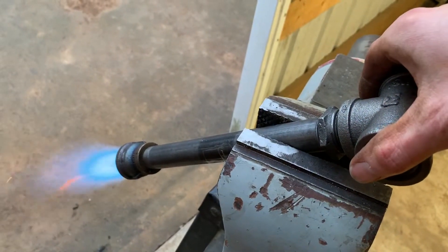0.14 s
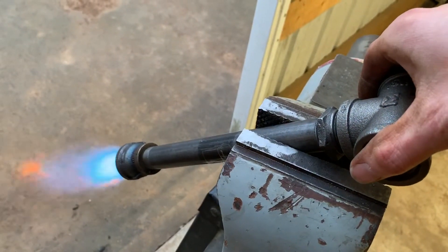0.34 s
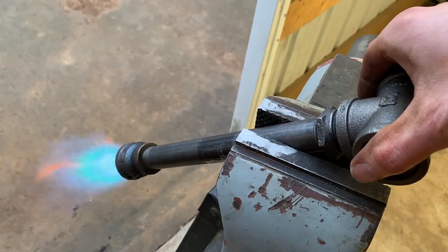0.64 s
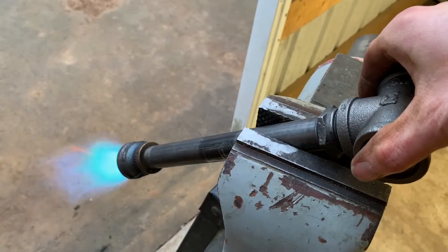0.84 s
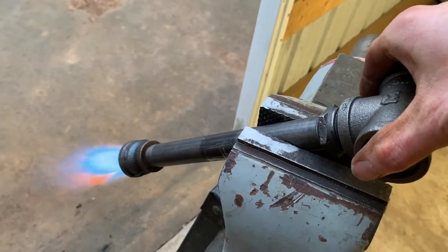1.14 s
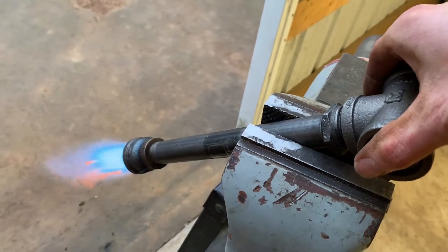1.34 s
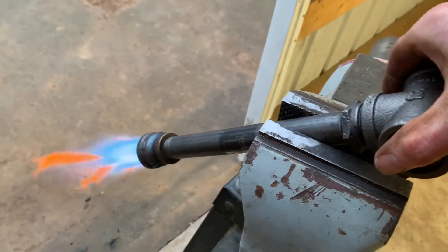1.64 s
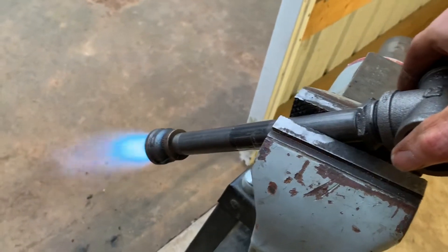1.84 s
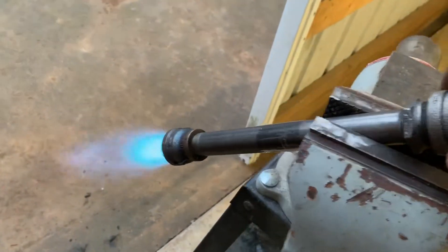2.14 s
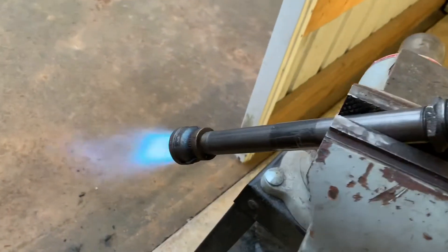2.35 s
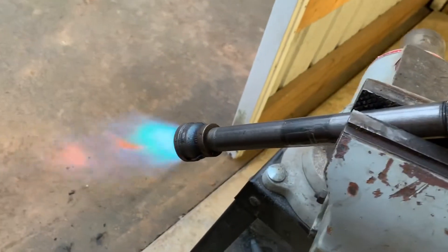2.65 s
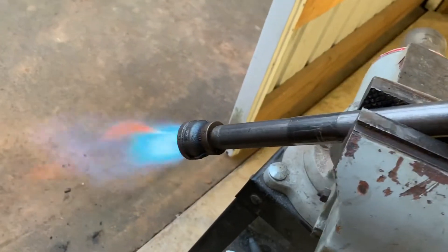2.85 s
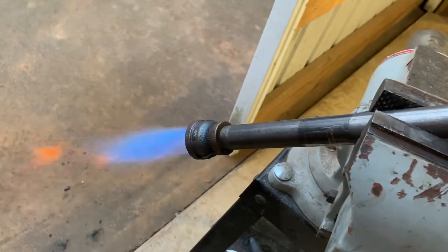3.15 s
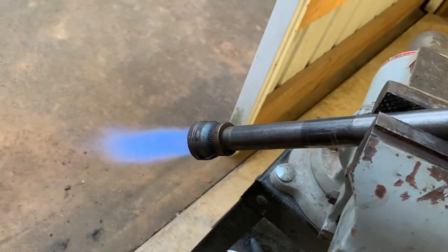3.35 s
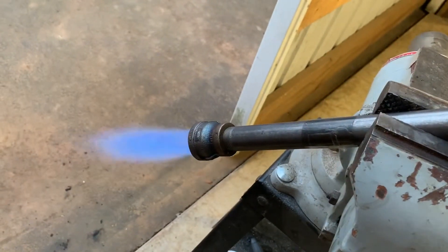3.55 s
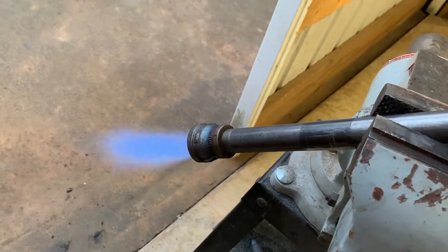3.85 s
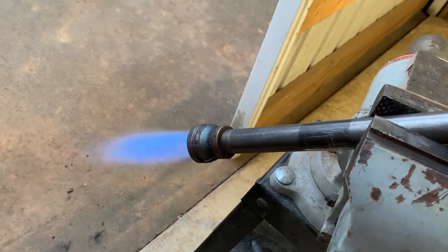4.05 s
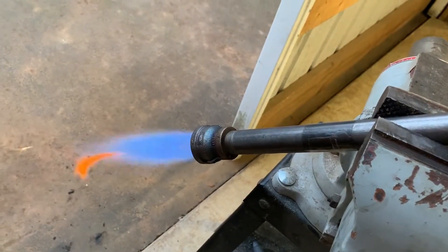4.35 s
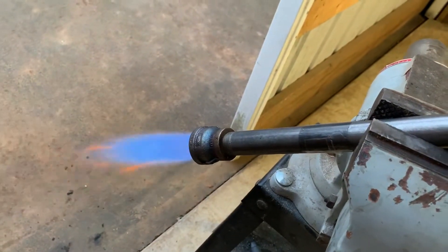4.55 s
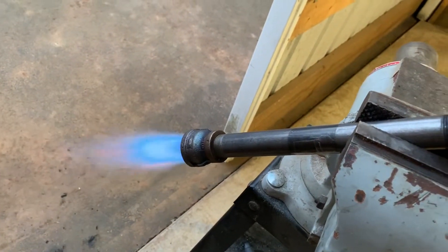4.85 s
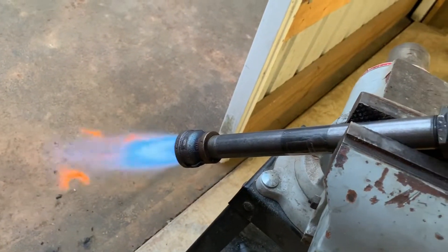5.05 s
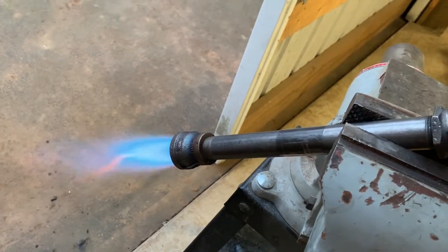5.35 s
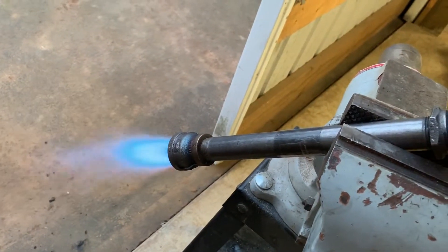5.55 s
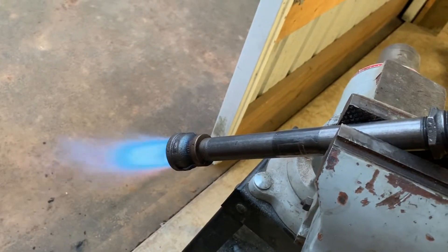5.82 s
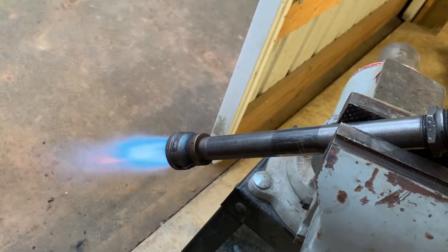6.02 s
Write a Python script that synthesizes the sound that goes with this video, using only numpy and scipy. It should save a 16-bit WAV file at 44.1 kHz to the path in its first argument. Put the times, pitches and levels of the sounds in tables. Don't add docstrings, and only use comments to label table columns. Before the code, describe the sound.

A gas burner in a steel vice is already burning at full force and never stops, heard close on a hand-held stereo microphone in a workshop doorway. From 0 to about 1.6 seconds the roar is steady: a low boom around a soft pitchless hum, a thick midrange rush and a bright, hollow, pipe-coloured hiss, with small flame puffs. Between 1.6 and 3.1 seconds the microphone drifts, the hiss changes colour in a sweeping, phasey way, and firmer puffs come near 2.3 and 2.6. At about 3.2 seconds a deep rumble swells sharply, with heavy, wind-like buffeting and thumps near 3.2, 3.6, 3.9 and 4.3. A brief brighter hiss passes near 4.6. By 4.9 the rumble falls away and the tone shifts again, leaving a steadier rushing roar that continues to the end at 6.2 seconds, cut off while burning.

```python
import sys
import numpy as np
from scipy import signal
from scipy.fft import rfft, irfft, next_fast_len
from scipy.io import wavfile
from scipy.ndimage import uniform_filter1d

SR = 44100
rng = np.random.default_rng(int(sys.argv[2]) if len(sys.argv) > 2 else 0)


def pcm_store(signal):
    levels = np.round(np.clip(np.atleast_2d(signal), -1, 1) * 32767)
    wavfile.write(sys.argv[1], SR, levels.astype(np.int16).T)


def ratio(d):
    e = np.asarray(d, float) / 20
    return 10 ** e


N = 272538
HOP, WIN = 256, 2048

# (frequency [Hz], right's phase lead [rad], left-right level [dB], likeness [0-1])
PORTS_BASS = [(30, 0.11, 0, 1), (250, -0.2, 0.5, 1), (448, -0.13, 0, 1), (685, -0.65, -1, 0.97),
              (790, 0, 2, 0.93), (935, -0.017, 1.5, 0.78)]


def along(points, hz):
    f, *cols = np.transpose(points)
    return [np.interp(np.log(hz + 1), np.log(f + 1), c)[:, None] for c in cols]


def curves(rows, t):
    s, *cols = np.transpose(rows)
    return [np.interp(t, s, c) for c in cols]


def filtered(x, response):
    m = next_fast_len(N + 8192)
    return irfft(rfft(x, m) * response(np.fft.rfftfreq(m, 1 / SR)), m)[..., :N]


def noise():
    return signal.stft(rng.standard_normal(N), SR, nperseg=WIN, noverlap=WIN - HOP)


def patches(shape, bins, frames):
    field = rng.standard_normal(shape)
    field = uniform_filter1d(field, bins, 0)
    field = uniform_filter1d(field, frames, 1)
    return field / field.std()


def hump(x, centre, width):
    return 1 / (1 + (2 * (x - centre) / width) ** 2) ** 2


def camera_place(t):
    # (time [s], place [0-3])
    path = [
        (0, 0),
        (1.6, 0),
        (2.05, .4),
        (2.35, .9),
        (2.6, 1.15),
        (2.8, 1.75),
        (3.15, 2),
        (4.55, 2),
        (4.8, 3),
        (6.18, 3),
    ]
    return curves(path, t)[0]


def at_place(db, place):
    return np.interp(place, np.arange(4), db)


def turbulence_db():
    # (time [s], level over calm [dB])
    stir = [(0, -2), (.4, -1), (1.4, -1), (2.25, 3.5), (2.9, 4.5), (3.1, 4.5), (3.25, 13), (3.85, 11),
            (4.3, 12), (4.7, 10.5), (4.9, 3.5), (5.3, 0.5), (6.18, -1.5)]
    return curves(stir, np.arange(N) / SR)[0]


def burning_noise(spectrum):
    steady_s = 0.29
    x = filtered(rng.standard_normal(N), lambda hz: ratio(along(spectrum, hz)[0][:, 0]))
    power = abs(uniform_filter1d(x ** 2, int(steady_s * SR)))
    return x / np.sqrt(power + 1e-20)


def rumble(stir_db):
    # (frequency [Hz], density [dB per Hz])
    eddy_spectrum = [(11, -46), (18, -28), (59, 6.5), (160, 7), (210, -39), (350, -120)]
    calm_db = -28.5
    return ratio(calm_db + stir_db) * burning_noise(eddy_spectrum)


def boom(stir_db):
    # (frequency [Hz], density [dB per Hz])
    cone_spectrum = [(65, -26), (110, -10.5), (162, -1.5), (204, 2), (284, -10), (293, -18), (302, -18),
                     (320, -20), (420, -69), (700, -120)]
    calm_db, follows = -17.5, 0.23
    return ratio(calm_db + follows * stir_db) * burning_noise(cone_spectrum)


def hiss_share(f):
    split_hz = 2500
    return 1 / (1 + (split_hz / (f + 1)) ** 4)


def pressure_db(f, t):
    # (time [s], pressure swing [dB])
    swings = [
        (0, -2),
        (1.4, -0.5),
        (2.3, 1),
        (2.75, -0.5),
        (3.2, 0.5),
        (4.4, 1),
        (5.2, 1),
        (5.8, 0.5),
        (6.18, 1.5),
    ]
    rush_db, rush_follows, hiss_db = -7, 0.37, -7.5
    swing_db, = curves(swings, t)
    high = hiss_share(f)
    return (rush_db + rush_follows * swing_db) * (1 - high) + (hiss_db + swing_db) * high


def bed_db(hz):
    # (frequency [Hz], density [dB per Hz])
    bed_spectrum = [(280, -5.5), (330, 1.4), (520, -1.73), (740, -10), (950, -11.5), (1550, -10),
                    (2000, -15.5), (3000, -16.5), (4300, -22.5), (6300, -26.5), (7300, -24.5), (9000, -27),
                    (12500, -21), (15700, -23.5)]
    return along(bed_spectrum, hz)[0]


def resonances(f, place):
    # (frequency [Hz], width [Hz], level over bed at places 0, 1, 2,
    # 3 [dB])
    stream_modes = [(419, 78, 1, 2, 0.77, -2.5), (643.5, 146, 8.5, 7.5, 7, 6.5), (827, 43, -4, 6.5, 8.8, 8),
                    (1087, 65, 2, -17, 9, 2.5), (1246, 81, 4.5, 6.5, 2.2, 3), (1396, 136, -14, 2, 8.5, 5),
                    (1768, 114, -3, -7, 7.9, 7), (2350, 320, -19, -18, 1.6, -30),
                    (2720, 510, -17, -2, 2.5, 2), (3160, 58, -14, -20, -17, -9),
                  (3590, 110, 11, 1.5, 11.5, 3.5), (4044, 123, 8, -21, 11.5, 6.5), (4525, 200, -1, 7, 9, 6),
                  (5000, 100, 9.5, -17, 8.5, 3), (5213, 92, 10, 11.5, 3, 7), (5570, 79, 10, 4, 7, -12),
                  (6200, 80, -14, 11, 4, -4), (6720, 88, -7, 12, 5, 5), (6950, 72, 8, 6, -7, -2),
                  (7580, 250, 6.5, 8, 10.5, -24),
                    (8190, 560, 4.5, 8.5, 6, 1), (8810, 280, 7.5, 8, 3, 6), (10150, 1400, 6.5, 7, 2.5, 3),
                     (10880, 570, -4, -1, 2.5, 1), (11400, 260, 4, -2, -15, -6),
                     (11850, 430, 4, -8, -17, -10), (11950, 350, 2, -8, -10, -1),
                     (13100, 350, 10, -10, 6, 8), (14050, 500, -8, -12, 8, -10),
                     (14700, 400, 11.5, 4, -1, -6)]
    power = 0
    for centre, width, *db in stream_modes:
        power = power + hump(f, centre, width) * ratio(at_place(db, place)) ** 2
    return power


def echo_valleys_db(f, place):
    # (frequency [Hz], width [Hz], level change at places 0, 1, 2, 3 [dB])
    valleys = [(761, 56, -7, -16, -7, -3), (932, 60, 6.5, 4, 1, -7), (2163, 140, 0.5, -20, -4, -6),
               (2380, 200, -11, -1, 0, -4), (3330, 180, -1, 0, -9, -8), (6170, 220, -6, -5, 1, -2),
               (6300, 150, -1, -3, -1, 2), (7350, 240, -10, -9, -1, -1), (8690, 180, -11, 3, 8, -3),
               (13800, 500, -6, -3, -2, -6), (14800, 400, -4, 0, 3, 7)]
    return sum(hump(f, centre, width) * at_place(db, place) for centre, width, *db in valleys)


def hand_drift_db(f, shape):
    return 2.45 * patches(shape, 5, 68) * np.clip(f / 1500, 0, 1)


def jet_flutter_db(f, shape):
    flutter = 0.32 * patches(shape, 67, 6) * hiss_share(f)
    clouds = 1.3 * patches(shape, 76, 30) * np.clip(f / 9000 - .5, 0, 1)
    gusts = 0.47 * patches(shape, 400, 5) * np.clip(f / 4000 - .5, 0, 1)
    return flutter + clouds + gusts


def puffs():
    # (time [s], peak [dB])
    pockets = [(0.27, -19), (.554, -19), (0.619, -22), (.643, -18), (.755, -17.5), (0.891, -21),
               (1.009, -18), (1.115, -15.5), (1.563, -21), (2.041, -19.5), (2.211, -25), (2.332, -12),
               (2.402, -23), (2.561, -16), (2.631, -27), (2.697, -21), (2.767, -23), (2.917, -20),
               (3.171, -8), (3.6, -8), (3.741, -12), (3.865, -9), (4.26, -11), (4.752, -15), (5.47, -24),
               (5.881, -30)]
    half_width_s = 0.003
    t = np.arange(N) / SR
    out = np.zeros(N)
    for s, db in pockets:
        u = (t - s) / half_width_s
        out += ratio(db + 3.5) * (1 - u ** 2) * np.exp(-u ** 2 / 2)
    return out


def glints(f, t):
    # (time [s], length [s], frequency [Hz], width [Hz], level over bed [dB])
    flashes = [
        (4.62, 0.17, 9000, 650, 14),
        (4.35, 0.11, 12800, 500, 3),
        (2.86, 0.18, 10800, 710, 11.5),
        (2.34, 0.19, 11400, 400, 6),
    ]
    return sum(hump(f, centre, width) * hump(t, s, 2 * length) * ratio(db) ** 2
               for s, length, centre, width, db in flashes)


def flame():
    stir_db = turbulence_db()
    roar = rumble(stir_db) + boom(stir_db) + puffs()
    half_turns = np.array([[-.5j], [.5j]])
    return filtered(roar, lambda hz: np.exp(half_turns * along(PORTS_BASS, hz)[0][:, 0]))


def stream_gain(hz, t):
    place = camera_place(t)
    f = hz[:, None]
    shape = (len(hz), len(t))
    power = 1 + resonances(f, place) + glints(f, t)
    level_db = bed_db(hz) + pressure_db(f, t) + echo_valleys_db(f, place)
    level_db = level_db + hand_drift_db(f, shape) + jet_flutter_db(f, shape)
    low_cut = 1 / (1 + (290 / (f + 1)) ** 12)
    return ratio(level_db) * np.sqrt(power) * low_cut


def ports(gain, hz, t, shared, own):
    # (frequency [Hz], right's phase lead at places 0, 1, 2, 3 [rad])
    lead_rows = [(1480, -1.7, -1, 0.55, -1), (1830, -1.7, -2.5, -2.5, -2.0), (3100, -4, -3.5, -2.5, -3),
                 (4020, -5, -3, -2, -3.5), (5340, -6, -3.5, -1.7, -3.5), (5900, -4, 0.4, 2.1, 0.6),
                 (6900, -1, 1.5, 2, 1.7), (7330, -1.8, -1, 2, 0.4)]
    # (frequency [Hz], left-right level at places 0, 1, 2, 3 [dB])
    balance_rows = [(1080, 4.5, 3, 3, 3), (1750, 2.5, 4, 7, 8), (2750, 3.5, 1, 3.5, 0),
                    (3520, 2, 0.5, -3.5, 6), (4100, 1, -3, -3.5, -7.5), (4600, -1, -8, -4.5, -7),
                    (5500, -7.5, -1, -5.5, -3.5), (6800, 1, -1, -1, -1)]
    # (frequency [Hz], likeness at places 0, 1, 2, 3 [0-1])
    alike_rows = [(1200, 1, 0.8, 0.75, 0.65), (1800, 0.38, 0.62, 0.87, 0.58),
                  (2400, 0.82, 0.66, 0.49, 0.73), (3280, 0.43, 0.5, 0.91, 0.8), (4040, 0.63, 0.28, 1, 0.75),
                  (5100, 0.81, 0.97, 0.31, 0.66), (6200, 0.37, 0.35, 0.48, 0.42),
                  (7000, 0.55, 0.88, 0.48, 0.62)]
    plain_hz = 7900
    lag_from_hz, lag_turn_hz = 7930, 3740
    f = hz[:, None]
    place = camera_place(t)
    near = [np.clip(1 - abs(place - k), 0, 1) for k in range(4)]

    def here(column, rows, last):
        low = [(row[0], *[row[column]] * 4) for row in PORTS_BASS]
        rows = low + rows + [(plain_hz, *[last] * 4)]
        return sum(share * value for share, value in zip(near, along(rows, hz)))

    delay = 2 * np.pi * (f - lag_from_hz) / lag_turn_hz
    lead = np.where(f > plain_hz, delay, here(1, lead_rows, -.4))
    lead += 0.3 * patches(lead.shape, 70, 12) * np.clip(f / 12000, 0, 1)
    tilt = ratio(here(2, balance_rows, 0))
    angle = np.arccos(np.clip(1.03 * here(3, alike_rows, 1), 0, 1)) / 2
    common, apart = np.cos(angle) * shared, np.sin(angle) * own
    left = tilt * (common + apart) * np.exp(-.5j * lead)
    right = (common - apart) * np.exp(.5j * lead)
    even = gain * np.sqrt(2 / (1 + tilt ** 2))
    return even * np.array([left, right])


def gas_stream():
    hz, t, shared = noise()
    own = noise()[2]
    pair = ports(stream_gain(hz, t), hz, t, shared, own)
    return signal.istft(pair, SR, nperseg=WIN, noverlap=WIN - HOP)[1][:, :N]


def scene():
    return flame() + gas_stream()


def roll_off(x):
    return signal.sosfilt(signal.butter(12, 15880, fs=SR, output="sos"), x)


def record(dry):
    top_hz = 15850
    soft = dry / (1 + abs(dry / 1.04) ** 6) ** (1 / 6)
    mix = filtered(soft, lambda hz: hz < top_hz)
    return roll_off(mix)


dry = scene()
out = record(dry)
pcm_store(out)
```